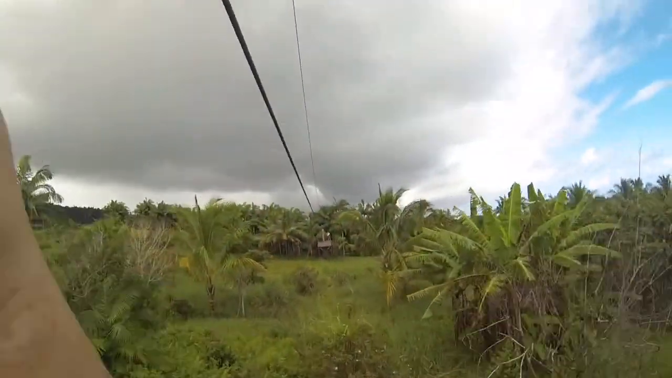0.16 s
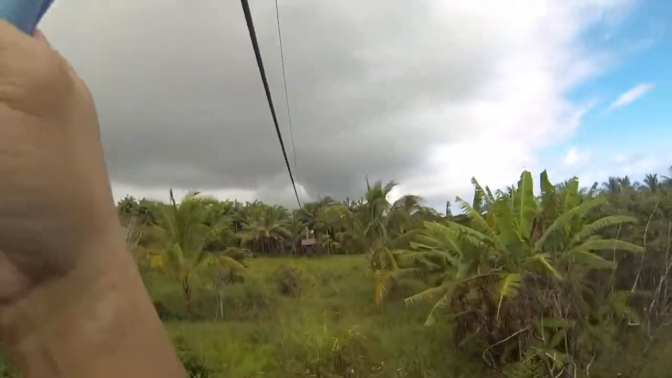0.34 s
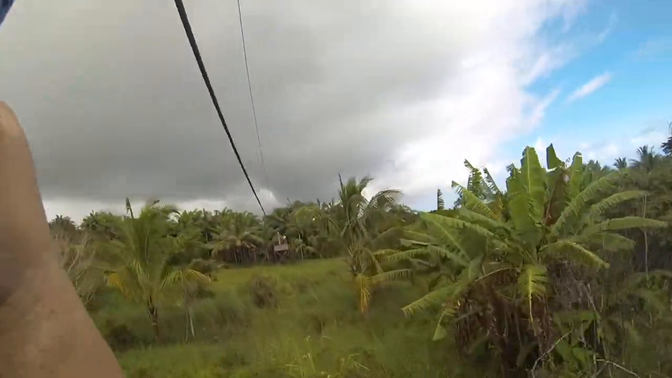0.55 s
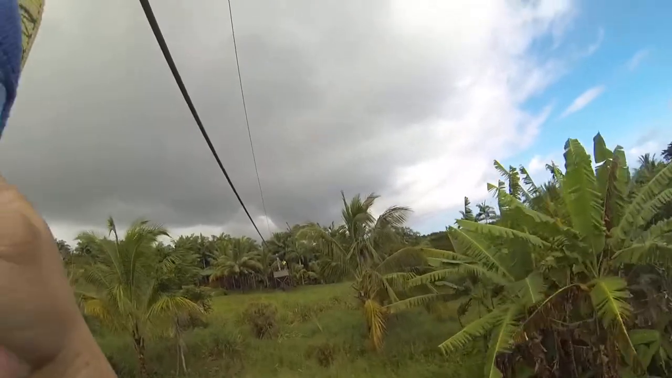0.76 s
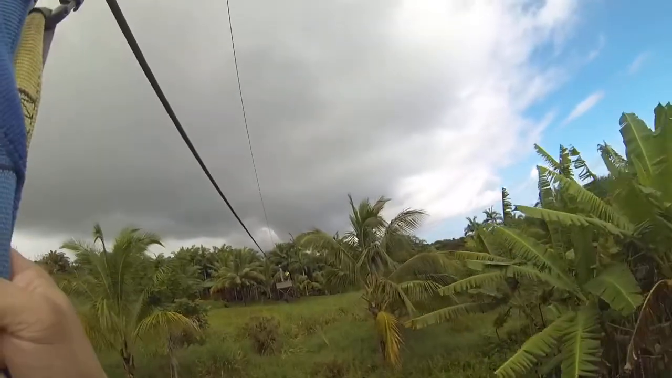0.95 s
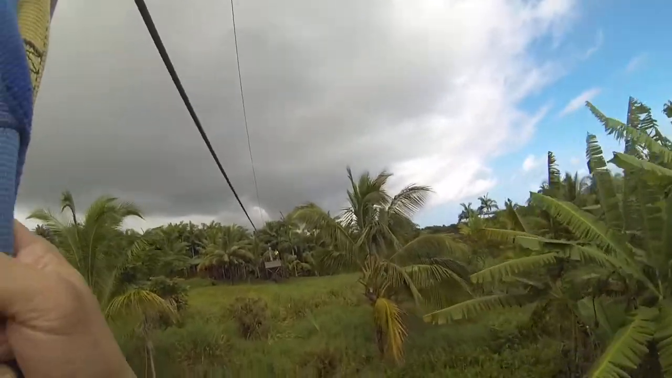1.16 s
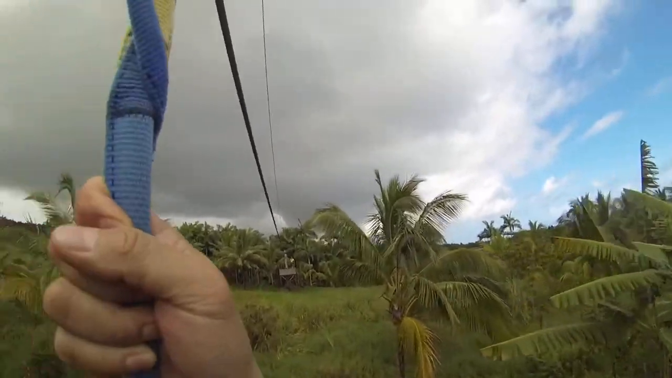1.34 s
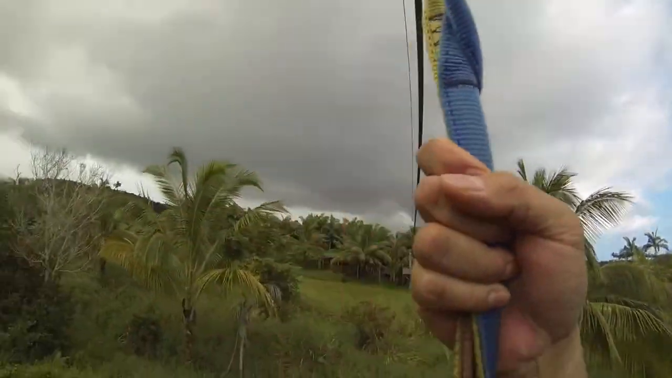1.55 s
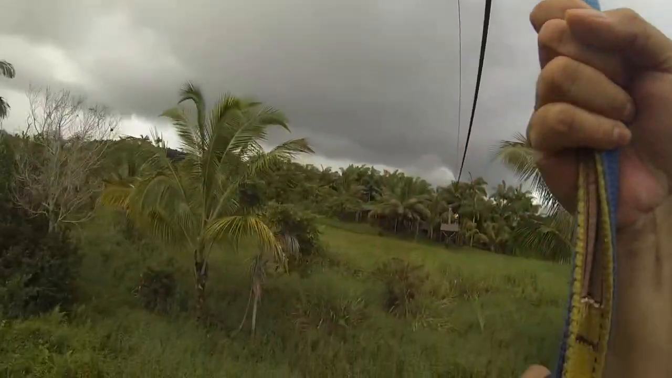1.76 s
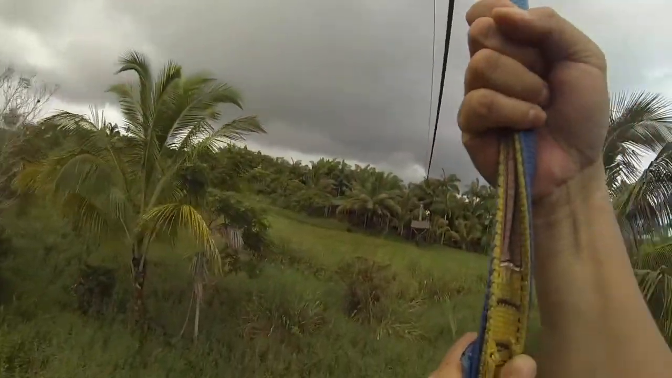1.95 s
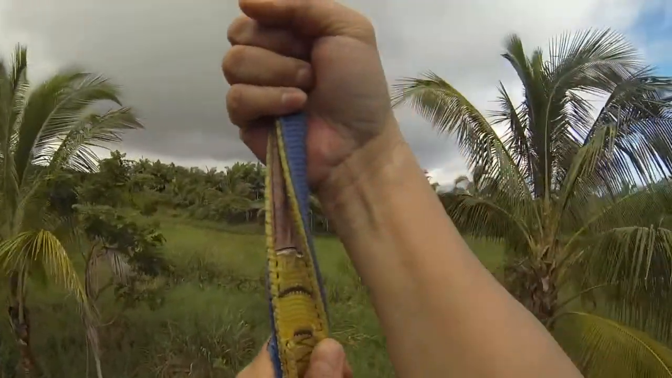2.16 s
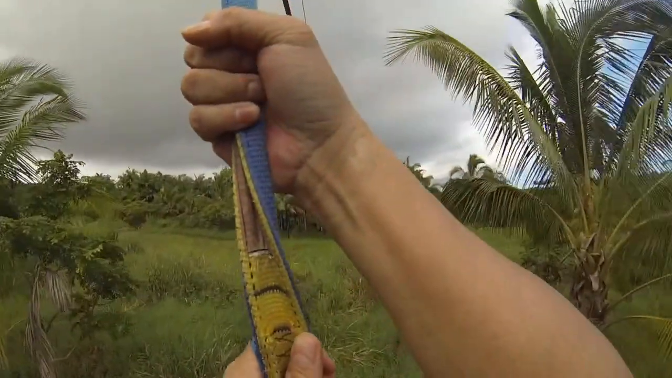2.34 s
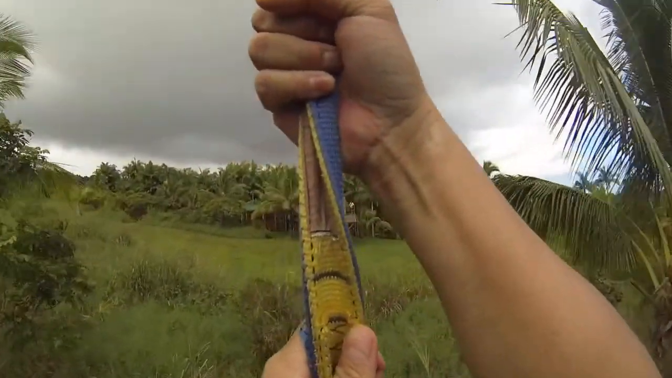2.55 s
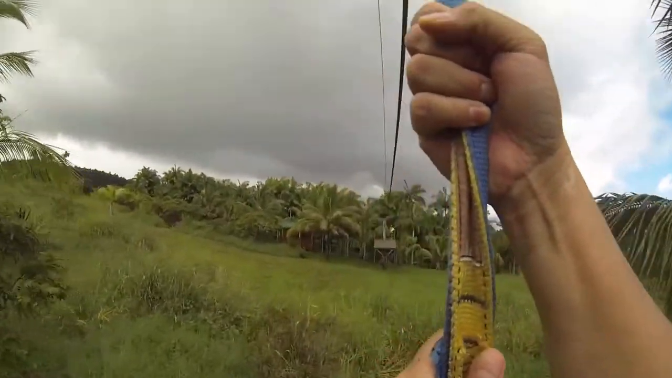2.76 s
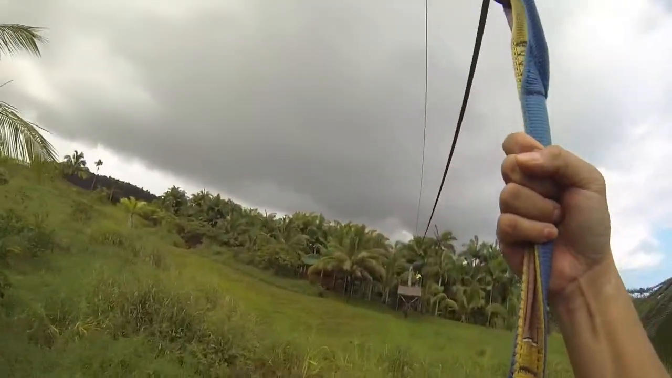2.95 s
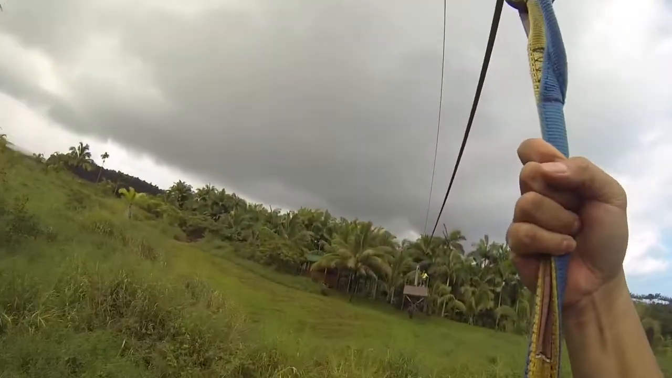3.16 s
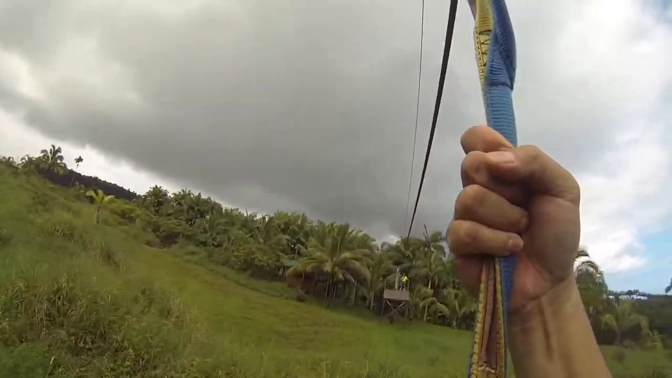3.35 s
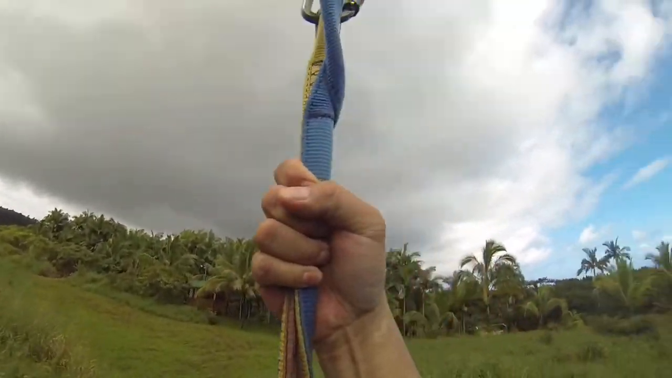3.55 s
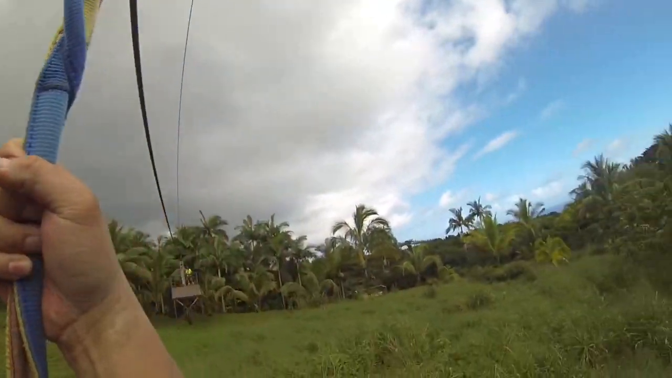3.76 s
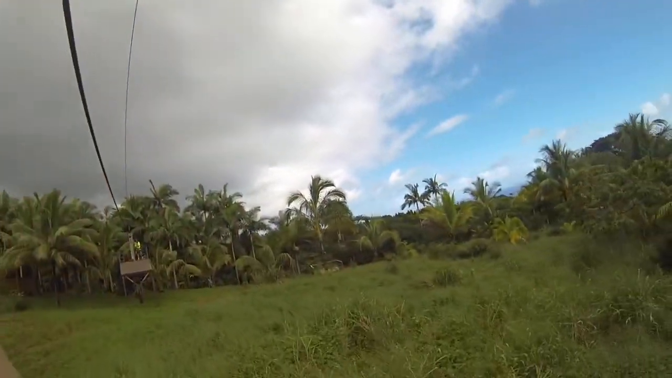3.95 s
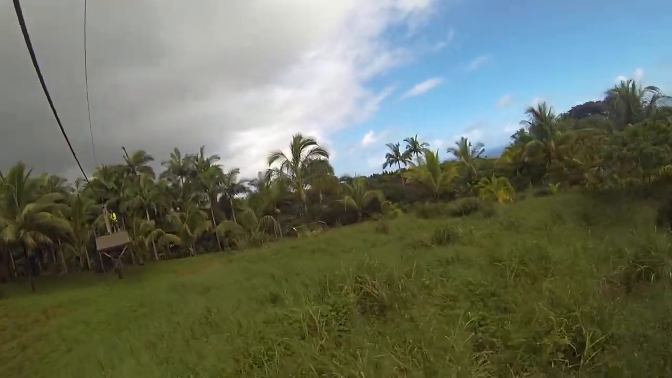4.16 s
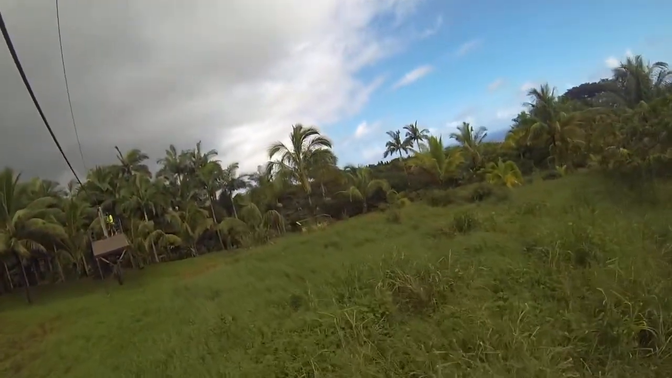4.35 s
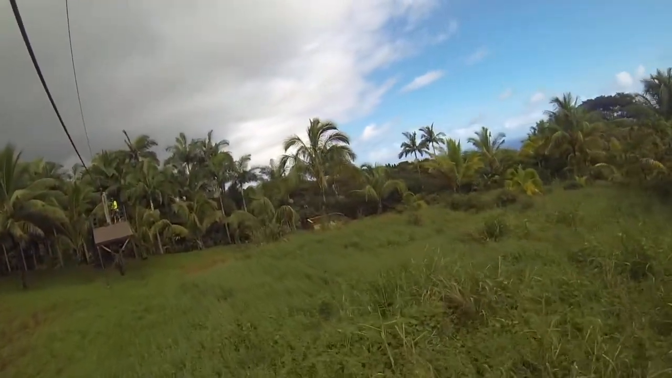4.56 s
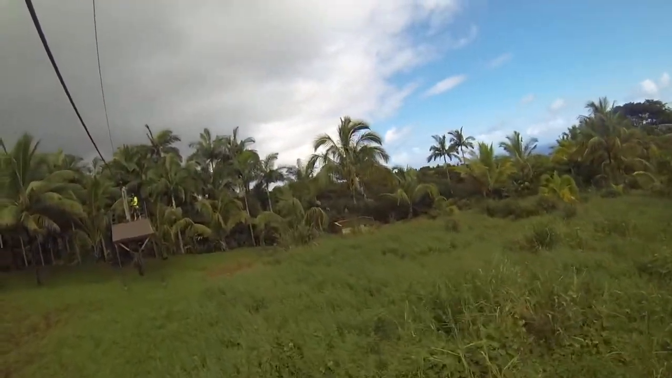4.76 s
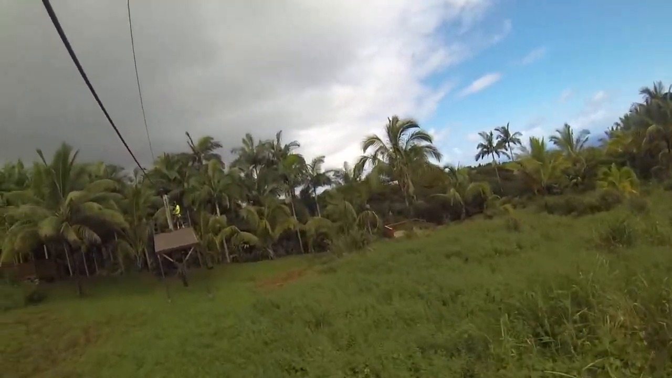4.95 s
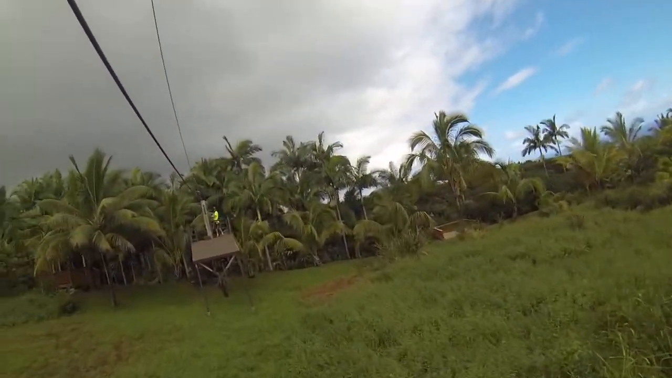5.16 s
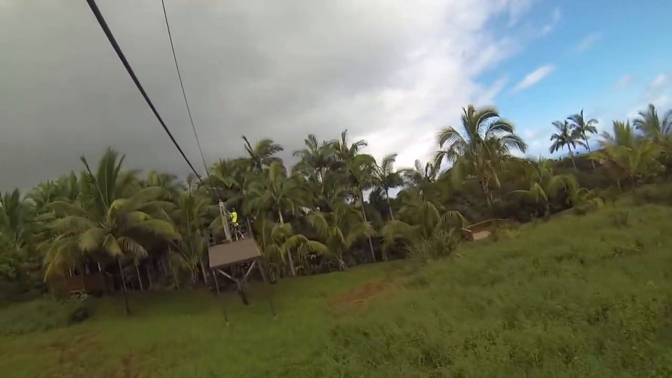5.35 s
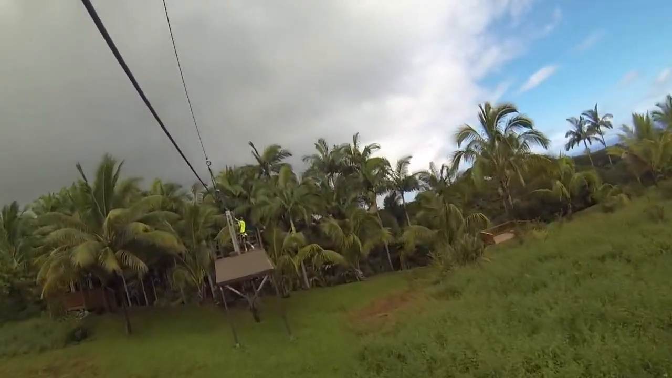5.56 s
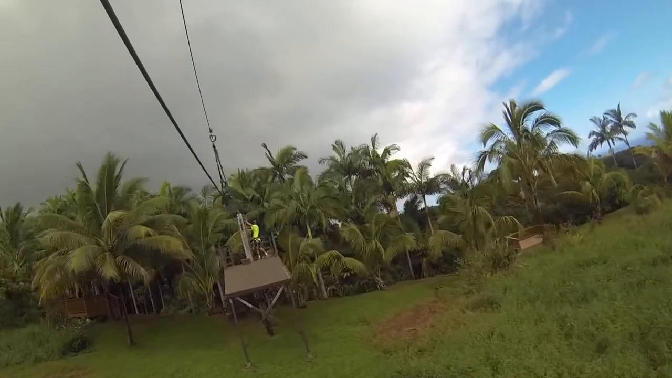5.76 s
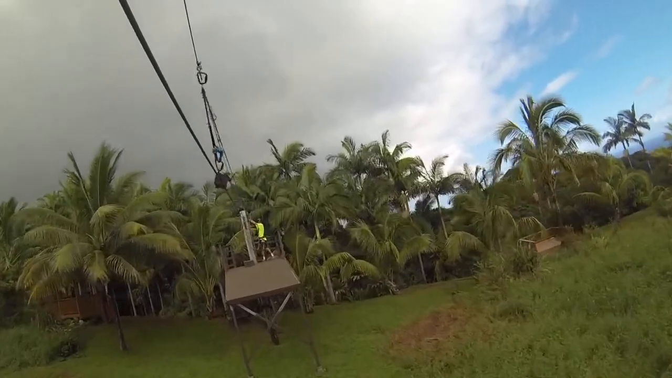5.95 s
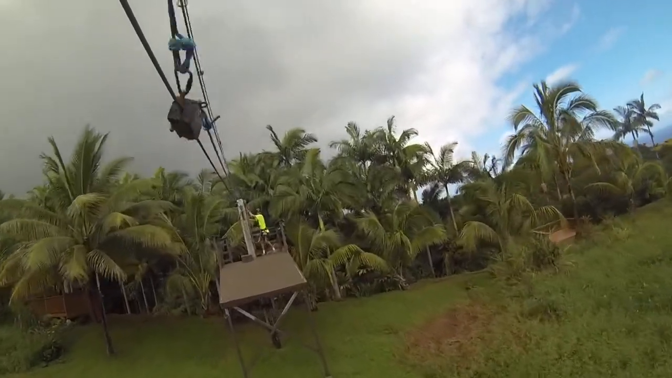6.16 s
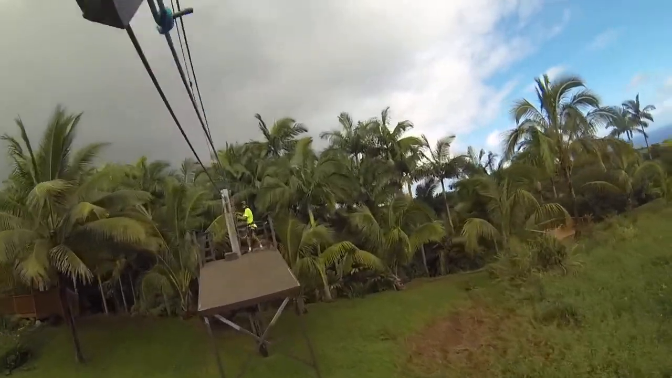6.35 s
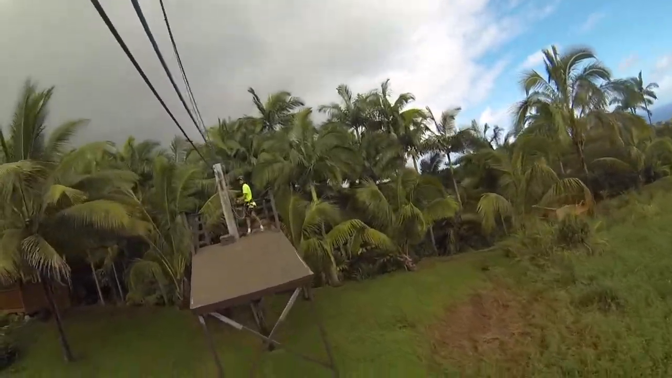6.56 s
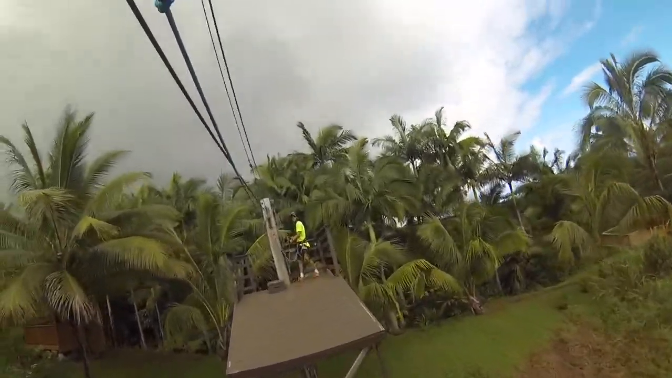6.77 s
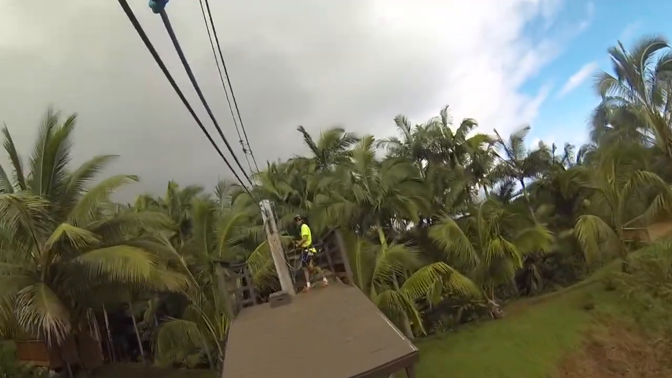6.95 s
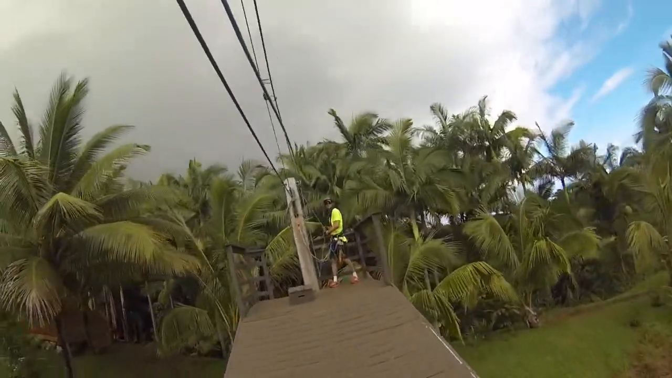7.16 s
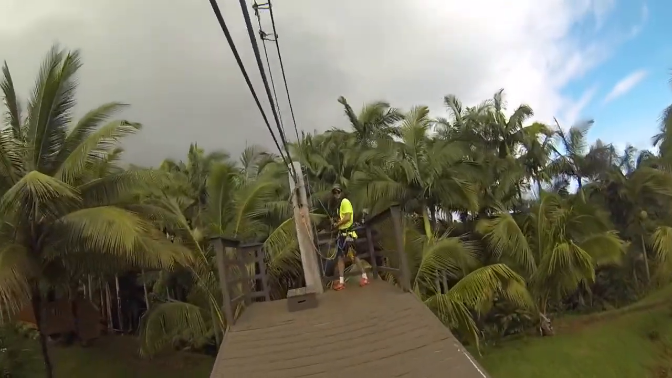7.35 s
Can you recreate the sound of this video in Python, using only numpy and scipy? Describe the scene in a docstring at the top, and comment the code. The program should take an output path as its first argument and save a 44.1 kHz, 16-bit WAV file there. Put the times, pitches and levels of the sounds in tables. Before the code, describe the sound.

A zipline trolley whines high and metallic along a cable through rumbling, buffeting wind, then knocks into a brake block and slows with a surging, falling pitch.

```python
"""A high metallic whine and hissing roll over rumbling wind: a rider runs down a zipline, the trolley just overhead.
Cable strands tick under the sheaves as a tone with sidebands; rolling noise rings the modes of the metal frame.
The pitch sinks as the ride slows, until the trolley knocks into the brake block and drags it along, surging.
Shaped noise makes the wind at the microphone, eddies thump on it, and its rush dies away with the speed."""
import sys
import numpy as np
from scipy import signal
from scipy.fft import rfft, irfft, next_fast_len
from scipy.io import wavfile
from scipy.ndimage import uniform_filter1d

SR = 44100
rng = np.random.default_rng(int(sys.argv[2]) if len(sys.argv) > 2 else 0)


def dump_mix(stems):
    """Bounce the given channels to the path in sys.argv[1] as a 16-bit WAV at rate SR."""
    frames = np.atleast_2d(stems).T  # one column per channel
    limited = np.clip(frames, -1, 1)  # hard clip at full scale
    pcm = np.round(limited * 32767).astype(np.int16)
    wavfile.write(sys.argv[1], SR, pcm)


N = 326781
TIME = np.arange(N) / SR
FREQ = np.maximum(np.fft.rfftfreq(next_fast_len(N, True), 1 / SR), 1)


def undb(db):
    """Decibels to gain."""
    return 10 ** (np.asarray(db) / 20)


def unit(x):
    """Scale to rms 1."""
    return x / np.sqrt(np.mean(x ** 2))


def curves(table):
    """Columns of a table, interpolated to one value per sample."""
    time_s, *columns = np.transpose(table)
    return [np.interp(TIME, time_s, column) for column in columns]


def shape(x, gain):
    """Filter by a gain per frequency bin."""
    size = next_fast_len(N, True)
    return irfft(rfft(x, size) * gain, size)[:N]


def noise(gain):
    """Gaussian noise of rms 1 with a gain per frequency bin."""
    return unit(shape(rng.standard_normal(N), gain))


def colour(points):
    """Gain per frequency bin from (hz, db) points, linear in log frequency."""
    hz, db = np.transpose(points)
    return undb(np.interp(np.log(FREQ), np.log(hz), db))


def resonance(at_hz, centre_hz, width_hz):
    """Gain of a steep-sided resonance: 1 at its centre, 1/2 at the edges of its width."""
    detune = (at_hz ** 2 - centre_hz ** 2) / (at_hz * width_hz)
    return 1 / (1 + detune ** 2)


def walk(rate_hz):
    """Random curve of rms 1 with rate_hz new values a second."""
    return unit(np.interp(TIME * rate_hz, np.arange(4096), rng.standard_normal(4096)))


def levelled(x, window):
    """Even out the running rms over a window in samples."""
    return x / np.sqrt(uniform_filter1d(x ** 2, size=window) + 1e-6)


# ride speed as whine pitch, before bounce and brake: time_s, pitch_hz
GLIDE = [(0.0, 2167), (0.3, 2143), (0.37, 2104), (0.47, 2169), (0.68, 2157), (1.0, 2207), (1.24, 2151),
         (2.19, 2195), (2.56, 2129), (2.97, 2219), (3.19, 2103), (3.48, 2137), (3.9, 2130), (4.0, 2040),
         (4.14, 2088), (4.23, 2056), (4.4, 2068), (4.89, 2019), (5.71, 1891), (6.43, 1800)]
CRUISE_HZ = 2150  # pitch at full speed
BOUNCE_HZ, BOUNCE_PERIOD_S, BOUNCE_CREST_S, BOUNCE_LASTS_S = 22, .527, .31, 3
BRAKE_S, BRAKE_HZ_PER_S = 6.43, 380
SURGE_HZ, SURGE_PERIOD_S, SURGE_DECAY_S = 200.2, .335, 0.508


def ride():
    """Speed as pitch in Hz: glide, dying bounce on the cable, steady braking with elastic surge."""
    glide_hz, = curves(GLIDE)
    bounce = np.cos(2 * np.pi * (TIME - BOUNCE_CREST_S) / BOUNCE_PERIOD_S)
    bounce = bounce * np.exp(-(TIME / BOUNCE_LASTS_S) ** 4)
    braking_s = np.maximum(TIME - BRAKE_S, 0)
    surge = np.sin(2 * np.pi * braking_s / SURGE_PERIOD_S) * np.exp(-braking_s / SURGE_DECAY_S)
    return glide_hz + BOUNCE_HZ * bounce - BRAKE_HZ_PER_S * braking_s - SURGE_HZ * surge


# airstream as the rider turns in and out of it: time_s, rumble_db, flutter_db (before FLUTTER_TRIM_DB)
AIRSTREAM = [(0, -26.5, -34.5), (.2, -28, -36), (.33, -20, -31), (.65, -25, -31), (1.05, -34.5, -37.5),
             (1.39, -31.5, -39), (1.53, -20, -33), (2.25, -24, -35.5), (2.65, -18.5, -37.5),
             (3.1, -24, -34.5), (3.7, -20, -31.5), (4.12, -25.5, -36.5), (4.97, -24, -39), (5.12, -33, -39),
             (5.95, -40.5, -43.5), (6.12, -30.5, -41), (6.5, -27.5, -43), (6.8, -33.5, -47),
             (7.41, -38.5, -52.5)]
# wind spectra, relative: freq_hz, gain_db
RUMBLE_SPECTRUM = [(10, -10), (22, -5), (35, -2.5), (46, 5), (58, -4.5), (75, -11), (95, -12), (130, -26),
                   (220, -63), (1000, -110)]
FLUTTER_SPECTRUM = [(60, -11), (105, 1.5), (150, -1.5), (230, -5), (325, -6), (390, -23.5), (600, -24.5),
                    (1500, -36), (5000, -100)]
RUSH_SPECTRUM = [(150, -6.5), (330, 3), (450, 1), (560, -1), (700, 0.5), (950, -0.5), (1500, 2.5),
                 (2500, -10), (6000, -18), (15000, -49)]
FLUTTER_TRIM_DB = -1
# rush: level at full speed, growth per doubling of speed, share of flutter swings followed
RUSH_DB, RUSH_DB_PER_OCTAVE, RUSH_FOLLOWS = -42.5, 18, 0.14
# small eddies, the upper rumble: lower edge, offset on flutter level, share of flutter level followed
EDDY_CORNER_HZ, EDDY_DB, EDDY_FOLLOWS = 62, 10.5, .7


def wind(pitch_hz, gust_db=1.0, swell_db=-0.5):
    """Turbulence at the microphone: deep rumble, gusty flutter above it, smooth rush growing with speed."""
    rumble_db, flutter_db = curves(AIRSTREAM)
    octaves = np.log2(pitch_hz / CRUISE_HZ)
    flutter_swing_db = flutter_db - np.median(flutter_db)
    rush_db = RUSH_DB + RUSH_DB_PER_OCTAVE * octaves + RUSH_FOLLOWS * flutter_swing_db
    # steady airstream: successive eddies of similar strength
    rumble = levelled(noise(colour(RUMBLE_SPECTRUM)), 6000)
    deep = shape(rumble, 1 / (1 + (FREQ / EDDY_CORNER_HZ) ** 8))
    eddies = (rumble - deep) * undb(EDDY_FOLLOWS * (flutter_db + EDDY_DB - rumble_db))
    gusts = undb(gust_db * walk(45) + swell_db * walk(14))
    flutter = unit(noise(colour(FLUTTER_SPECTRUM)) * gusts)
    rush = unit(noise(colour(RUSH_SPECTRUM)) * undb(1.3 * walk(40)))
    return (deep + eddies) * undb(rumble_db) + flutter * undb(flutter_db + FLUTTER_TRIM_DB) + rush * undb(rush_db)


# eddies reaching the microphone; thump and swell lag start_s: start_s, thump_db, swell_db
EDDY_HITS = [(0.564, -36, -37), (.62, -31, -21), (.889, -23, -23.5), (1.593, -23.5, -19), (1.71, -22, -30),
             (1.994, -26, -22), (2.63, -35, -24.5), (3.11, -25, -28), (3.234, -32, -27), (3.315, -33, -33),
             (3.623, -23, -33), (3.859, -19, -33), (4.095, -18, -44), (4.177, -21.5, -34),
             (4.271, -19, -44), (4.34, -26, -20), (4.43, -32, -25), (4.52, -32, -23), (4.61, -20, -19.5),
             (4.679, -33, -19), (4.783, -19, -21), (4.938, -27, -22), (5.311, -22, -30), (5.712, -22, -29),
             (5.783, -27, -31), (5.836, -45, -25), (5.916, -27, -37), (6.071, -23.5, -31), (6.47, -42, -24)]


def buffets(push_s=0.0018, thump_lag_s=0.0098, swell_s=0.031, swell_lag_s=0.016, wake_db=-13):
    """Each large eddy pushes then sucks at the microphone, leaving brief flutter and a swell of rumble."""
    flutter = noise(colour(FLUTTER_SPECTRUM))
    rumble = noise(colour(RUMBLE_SPECTRUM))
    wake = levelled(rumble, 3000) + undb(wake_db) * flutter
    out = 0
    for start_s, thump_db, swell_db in EDDY_HITS:
        age = (TIME - start_s - thump_lag_s) / push_s
        push_pull = -2 * age / (1 + age ** 2) ** 1.03
        brief_flutter = 0.3 * flutter / (1 + (age / 4) ** 2)
        swell = np.exp(-((TIME - start_s - swell_lag_s) / swell_s) ** 2)
        out = out + undb(thump_db) * (push_pull + brief_flutter) + undb(swell_db) * wake * swell
    return out


def tug(start_s=6.587, level_db=-38, decay_s=0.0059):
    """The harness pulls taut as the brake takes hold: a dull, decaying noise burst."""
    fade = (TIME >= start_s) * np.exp(-np.abs(TIME - start_s) / decay_s)
    return noise(resonance(FREQ, 420, 350)) * fade * undb(level_db)


# moments when one narrow band swells: bright opening hiss, modes ringing up, whine sidebands crossing a mode:
# peak_s, centre_hz, width_hz, half_length_s, level_db
MODE_SWELLS = [(.07, 11600, 250, 0.096, -49), (.12, 7440, 110, 0.093, -35.5),
               (0.362, 5000, 450, 0.44, -39.5), (.45, 9830, 500, 0.77, -50), (1.34, 5320, 140, 0.1, -36.5),
               (1.537, 3200, 330, .08, -37), (1.55, 2420, 200, .08, -44), (2.348, 4720, 90, 0.17, -38),
               (2.82, 2850, 150, 0.078, -45), (3.2, 3920, 110, 0.34, -42), (3.519, 3300, 400, 0.23, -40),
               (5.31, 2138, 35, 0.16, -39), (5.86, 2130, 35, 0.09, -35), (6.66, 5370, 260, 0.1, -42),
               (7.057, 5290, 200, 0.026, -44)]


def mode_swells():
    """Narrow noise bands that swell and fade, short or long."""
    out = 0
    for peak_s, centre_hz, width_hz, half_length_s, level_db in MODE_SWELLS:
        swell = np.exp(-((TIME - peak_s) / half_length_s) ** 2)
        out = out + noise(resonance(FREQ, centre_hz, width_hz)) * undb(level_db) * swell
    return out


# trolley and cable modes: centre_hz, width_hz, level_db (relative), swung_change_db, pressed_change_db
FRAME_MODES = [(1064.5, 87, -13, -6.5, -3), (1285, 165, -8, -0.5, -5.5), (1470, 340, -3.5, -6.5, 4),
               (2162, 265, -7, -1.5, 0.5), (2682, 530, -4.5, -6.5, -0.2), (3114, 370, -2.5, -27.5, -4.5),
               (3296, 360, -14, 4.5, -8), (3738, 340, -8.5, -11.5, -2.5), (3930, 240, -9, -2.4, -5),
               (4304, 490, -16.5, 2.5, 2), (4732, 240, -9, 1.5, 1), (5060, 420, -12, -4.5, 0.5),
               (5404, 133, -12.5, 1.5, 2.5), (5590, 150, -12, -7, -6), (6050, 910, -18, 6, 2.5),
               (6830, 410, -20, -7, 1), (7382, 195, -7.5, -16.5, -2), (7950, 350, -15, -8, -1.5),
               (8510, 230, -18, -4, -0.5), (9564, 810, -20, 0, -0.5), (10110, 310, -23, -9, -13),
               (10400, 240, -27.5, 0.5, 5), (11230, 1300, -19, -8.5, 3.5), (11600, 160, -19.5, -22, 3.5),
               (11972.0, 798.0, -34.5, -15, -2), (12760, 1017.0, -24.5, -9, -2),
               (14340, 1138.0, -32, -5.5, 3)]
# contacts with the brake block: start_s, level_db, decay_s, top_hz (highest the contact excites)
BRAKE_CONTACTS = [(6.4275, -22.5, .005, 2600), (6.436, -26, .007, 12000), (6.456, -32, .006, 2600),
                  (6.468, -43, .02, 14000), (6.505, -35, .005, 11000)]


def knocks(crack_db=-7):
    """Trolley hits brake block, each contact with its own brightness: dull and loud, bright crack, faint rattle."""
    body = 0
    for centre_hz, width_hz, level_db, _, _ in FRAME_MODES[1:]:  # block damps the lowest mode
        body = body + undb(level_db) * resonance(FREQ, centre_hz, 2 * width_hz) / np.sqrt(width_hz)
    body = unit(body)
    crack = unit(resonance(FREQ, 7500, 9000)) * undb(crack_db)
    out = 0
    for start_s, level_db, decay_s, top_hz in BRAKE_CONTACTS:
        fade = (TIME >= start_s) * np.exp(-np.abs(TIME - start_s) / decay_s)
        contact = 1 / (1 + (FREQ / top_hz) ** 4)
        out = out + undb(level_db) * fade * noise((body + crack) * contact)
    return out


# trolley hang: time_s, swung_sideways_0_to_1, pressed_0_to_1 (by a strap pull or the brake block)
TROLLEY_POSE = [(0, 0.19, 0.4), (.7, 0.5, 0.2), (.9, 0.6, 0.7), (1.3, 0.42, 0.2), (1.55, 1, 0),
                (3.55, 0.95, 0.23), (3.85, 0.86, 0.3), (4.15, 0.17, 0), (6.44, 0.08, 0), (6.5, 0, 0.67),
                (7.41, 0.08, 0.83)]
# rider's weight on the sheaves: time_s, extra_rolling_db
SHEAVE_LOAD = [(0, -0.5), (1, 1), (1.9, 0.1), (2.5, -2), (4.15, 1.5), (4.3, -1), (6.3, 0.7), (6.5, -2),
               (7.08, -1), (7.41, -3.5)]
# level at full speed, growth per doubling of speed
ROLL_DB, ROLL_DB_PER_OCTAVE = -34, 17.5
# spectral tilt, dB per octave of frequency: at full speed, added per doubling of speed, added when pressed
TILT_DB, TILT_DB_PER_OCTAVE, PRESSED_TILT_DB = 1, 1, -2.2


def rolling(pitch_hz, grain_db=0.71):
    """Rough cable rubs the sheaves and rings the frame; speed brightens it, pose picks the modes."""
    load_db, = curves(SHEAVE_LOAD)
    swung, pressed = curves(TROLLEY_POSE)
    octaves = np.log2(pitch_hz / CRUISE_HZ)
    roll_db = ROLL_DB + ROLL_DB_PER_OCTAVE * octaves + load_db
    tilt_db = TILT_DB + TILT_DB_PER_OCTAVE * octaves + PRESSED_TILT_DB * pressed
    out = 0
    for centre_hz, width_hz, level_db, swung_db, pressed_db in FRAME_MODES:
        sway_db = (.7 + swung) * walk(5)
        pose_db = swung * swung_db + pressed * pressed_db
        mode_db = level_db + pose_db + tilt_db * np.log2(centre_hz / 3800) + sway_db
        skirt = resonance(FREQ, centre_hz, width_hz)
        core = .7 * resonance(FREQ, centre_hz, width_hz / 5)
        out = out + noise(skirt + core) * undb(mode_db)
    return out * undb(roll_db + grain_db * walk(260))


# reflection off the rider's arm and shoulder: time_s, extra_delay_ms, strength_0_to_1
ARM_PATH = [(0, 0.72, 0.2), (.7, 0.51, 0.03), (1.3, 0.896, 0.2), (1.6, 0.45, 0), (2, 0.71, 0),
            (2.3, 0.54, 0.2), (2.7, 0.6, 0.17), (3, 0.55, 0.2), (3.4, 0.74, 0), (3.8, 0.76, 0.53),
            (4.2, 0.84, 0)]


def off_the_arm(x):
    """A short, moving reflection above about 3 kHz combs the treble as the rider swings."""
    delay_ms, strength = curves(ARM_PATH)
    oversampled = signal.resample_poly(x, 4, 1)  # for smooth fractional delays
    late = np.interp(TIME - delay_ms * 1e-3, np.arange(len(oversampled)) / (4 * SR), oversampled)
    return x + strength * shape(late, 1 / (1 + (3000 / FREQ) ** 6))


# singing band, rises with speed until it settles on the frame's mode near 2.15 kHz: pitch_hz, centre_hz
SINGING_BAND = [(1450, 1320), (1600, 1430), (1830, 1630), (2000, 1790), (2072, 1930), (2100, 2100),
                (2210, 2150)]
# cable song strength: time_s, level_db (before SONG_TRIM_DB)
SINGING_LEVEL = [(0, -32.5), (.24, -31), (.42, -34.5), (.97, -30.5), (1.16, -34.5), (1.42, -29.5),
                 (1.9, -39.5), (2.65, -44), (2.98, -33.5), (3.2, -35.5), (3.8, -34), (4.02, -42),
                 (5.3, -41), (6.25, -41.5), (6.42, -34.5), (6.48, -38), (6.55, -34.5), (6.9, -45),
                 (7.05, -38), (7.14, -45), (7.41, -54)]
SONG_TRIM_DB = -1


def whine(pitch_hz, strands_per_turn=21.4, ring_db=-48, scrape_db=-9):
    """Strands tick under the sheave; each turn repeats the pattern, so the whine splits into sidebands."""
    centre_hz = np.interp(pitch_hz, *np.transpose(SINGING_BAND))
    width_hz = np.interp(centre_hz, [1450, 1700, 2100], [180, 340, 220])
    level_db, = curves(SINGING_LEVEL)
    _, pressed = curves(TROLLEY_POSE)
    pitch_hz = pitch_hz * (1 + .0015 * walk(45))
    song, power, ring = 0, 0, 0
    for side in np.arange(-6, 5):
        side_hz = pitch_hz * (1 + side / strands_per_turn)
        # upper sidebands are the least steady
        waver_hz = (4 + 9 * max(side + .5, 0)) * walk(70)
        cycles = np.cumsum(side_hz + waver_hz) / SR + rng.random()
        line = np.sin(2 * np.pi * cycles) * undb(3 * walk(10))
        weight = resonance(side_hz, centre_hz, width_hz)
        song = song + weight * line
        power = power + weight ** 2
        # sidebands swell as they slide through the frame's mode near 2.14 kHz
        ring = ring + resonance(side_hz, 2140, 100) * line
    # pressed, the lines smear into a hoarse tone as the sheave skids
    phase = 2 * np.pi * np.cumsum(centre_hz) / SR
    scrape = unit(walk(190) * np.sin(phase) + walk(190) * np.cos(phase))
    clean = unit(song / np.sqrt(power))
    tone = clean * (1 - pressed / 4) + scrape * (undb(scrape_db) + pressed / 4)
    return tone * undb(level_db + SONG_TRIM_DB) + unit(ring) * undb(ring_db) * (1 - pressed)


def scene():
    """Sum of wind and trolley in one channel; speed drives whine, rolling and rush."""
    pitch_hz = ride()
    air = wind(pitch_hz) + buffets()
    contacts = tug() + mode_swells() + knocks()
    trolley = off_the_arm(rolling(pitch_hz)) + whine(pitch_hz)
    return (air + contacts + trolley)[None]


TOP_HZ = 15200


def record(dry):
    """The camera cuts the top: steep elliptic low-pass at TOP_HZ."""
    return signal.sosfilt(signal.ellip(10, .2, 80, TOP_HZ, fs=SR, output="sos"), dry)


dry = scene()
out = record(dry)
dump_mix(out)
```